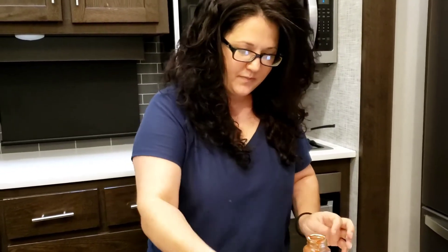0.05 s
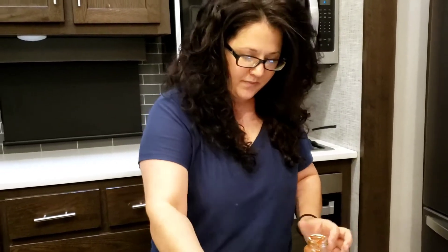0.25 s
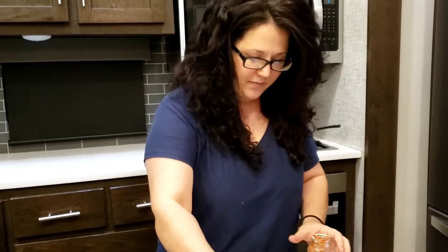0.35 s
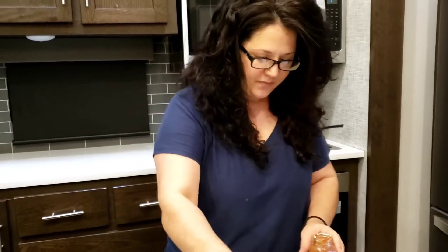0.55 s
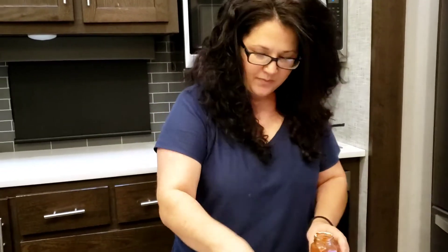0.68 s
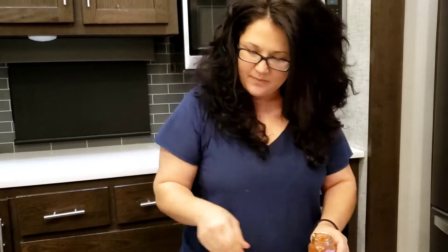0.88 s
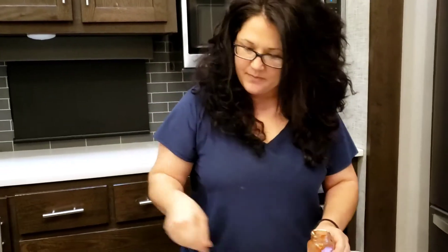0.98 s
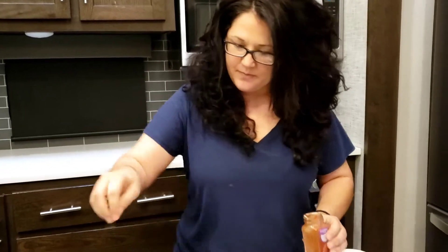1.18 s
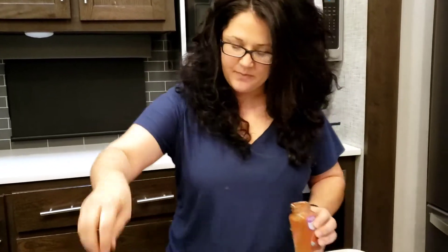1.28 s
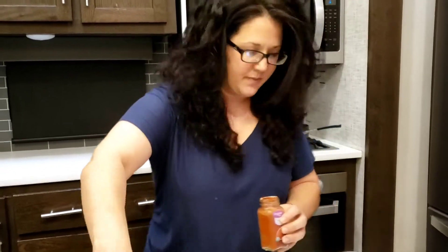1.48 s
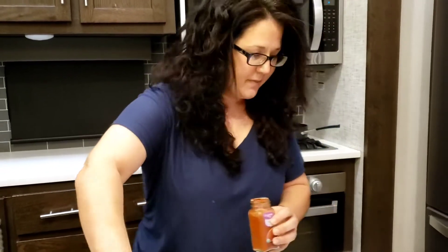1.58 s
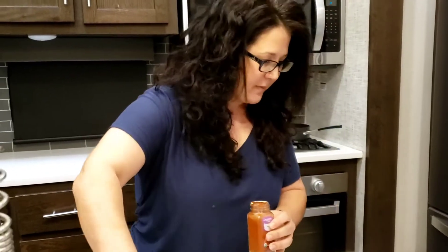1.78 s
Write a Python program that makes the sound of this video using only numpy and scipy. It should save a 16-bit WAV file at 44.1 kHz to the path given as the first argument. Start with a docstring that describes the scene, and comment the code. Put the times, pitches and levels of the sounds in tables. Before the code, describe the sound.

Steel utensils clink and rattle on a kitchen counter, followed by soft handling noises.

```python
"""A low room rumble and a faint rustle, then steel utensils clink close by on a kitchen counter.
Nudged, slid and dropped, they give bright ticks, duller clacks and thin metal rings;
the heavier blows thump the counter. A small live kitchen smears each contact.
Afterwards only soft handling noises remain over the rumble."""
import sys
import numpy as np
from scipy import signal
from scipy.fft import rfft, irfft
from scipy.io import wavfile

SR = 44100
rng = np.random.default_rng(int(sys.argv[2]) if len(sys.argv) > 2 else 0)


def digitize_waveform(pressure):
    """Quantize a signal to 16-bit integers and store it at the path in sys.argv[1].

    Rows of a 2-D input are taken as channels; values are limited to [-1, 1].
    """
    field = np.atleast_2d(pressure).T
    bounded = np.clip(field, -1, 1)
    quanta = np.round(bounded * 32767).astype(np.int16)
    wavfile.write(sys.argv[1], SR, quanta)


N = 81585


def undb(db):
    """Decibels to gain."""
    return 10 ** (np.asarray(db) / 20)


def at(points, hz):
    """Read a table on a log-frequency axis."""
    p = np.array(points, float)
    return np.interp(np.log(hz + 1e-6), np.log(p[:, 0]), p[:, 1])


def sides(db):
    """Left and right gains for a level difference, at constant power."""
    gains = undb(np.array([db, -db]) / 2).reshape(2, -1)
    return gains / np.sqrt(np.mean(gains ** 2, axis=0))


def wander(rate, size=N):
    """Random drift with a spread near 1, turning `rate` times a second."""
    knots = rng.standard_normal(256)
    return np.interp(np.arange(size) / SR * rate, np.arange(len(knots)), knots)


def decay(t, t60):
    """A fade that falls 60 dB in t60 seconds."""
    return np.exp(-np.log(1000) * t / t60)


def add(out, start, sound):
    """Mix a sound in at a time in seconds."""
    i = int(start * SR)
    out[:, i:i + sound.shape[1]] += sound[:, :N - i]


# Stereo lean. Each row: frequency in Hz, left over right in dB.
STEREO_LEAN = [(60, -2.5), (250, -3.5), (700, -6.5), (1300, -9), (2400, -10), (4800, -9), (6800, -2),
               (8500, 4), (11000, 0), (15000, 0.2)]
# Stereo width. Each row: frequency in Hz, likeness of the channels from 0 (wide) to 1 (mono).
STEREO_LIKENESS = [(60, .98), (150, 0.76), (350, .65), (800, 0.3), (2000, 0.068), (15000, 0.027)]
def noise(colour, size=N):
    """Coloured noise at unit level with the room's stereo image: narrow lows, wide highs."""
    hz = np.arange(size // 2 + 1) * SR / size
    common, left, right = rfft(rng.standard_normal((3, size)))
    likeness = at(STEREO_LIKENESS, hz)
    spectrum = np.sqrt(likeness) * common + np.sqrt(1 - likeness) * np.array([left, right])
    wave = irfft(spectrum * undb(at(colour, hz)) * sides(at(STEREO_LEAN, hz)), size)
    return wave / np.sqrt(np.mean(wave ** 2))


def burst(colour, crack_s=0.0004, early_s=0.0077, room_t60_s=0.31):
    """One contact: a crack, close reflections off counter and cupboards, then the room's tail."""
    t = np.arange(SR // 2) / SR
    crack = undb(0.5) * np.exp(-t / crack_s)
    early = np.exp(-t / early_s)
    tail = undb(-3) * decay(t, room_t60_s)
    return noise(colour, len(t)) * np.sqrt(crack ** 2 + early ** 2 + tail ** 2)


def ring(modes, rise_s=0.0005, scatter_db=3, waver=0.41, detune=0.001):
    """Struck modes; each blow weights them anew and reflections make them waver in each ear."""
    t = np.arange(SR // 2) / SR
    out = np.zeros((2, len(t)))
    for hz, db, t60 in modes:
        weight, drift = rng.standard_normal(2)
        envelope = undb(db + scatter_db * weight) * decay(t, t60)
        lean = sides(at(STEREO_LEAN, hz))
        for ear in range(2):
            phase = 2 * np.pi * (hz * (1 + detune * drift) * t + rng.random())
            reflected = waver * wander(70, len(t)) * np.cos(phase)
            out[ear] += lean[ear] * envelope * (np.sin(phase) + reflected)
    nominal_rms = np.sqrt(sum(undb(db) ** 2 for _, db, _ in modes) / 2)
    return out * (1 - np.exp(-t / rise_s)) / nominal_rms


# The rumble's dark colour. Each row: frequency in Hz, relative level in dB.
RUMBLE_COLOUR = [(15, -39.5), (30, -15.5), (60, -9.5), (90, -10), (130, -7), (185, -0.5), (230, -2.5),
                 (300, -7), (380, -13), (560, -23), (1050, -19.5), (1700, -31.5), (2900, -32.5),
                 (4500, -41), (7000, -50.5), (11000, -41.5), (15500, -39.5)]
# Its fader ride. Each row: time in seconds, level in dB.
RUMBLE_RIDE = [(0, -63), (.35, -57), (.75, -63.5), (1.0, -66), (1.2, -68.5), (1.42, -67.5), (1.56, -66.5),
               (1.65, -71), (1.78, -66), (1.85, -66)]
def room_tone(waver_db=1.5, lag_s=0.00049, pan_db=-2):
    """A low, gently wavering rumble with a trace of hiss, reaching the right side first."""
    t = np.arange(N) / SR
    level_db = np.interp(t, *np.array(RUMBLE_RIDE).T) + waver_db * wander(12)
    left, right = noise(RUMBLE_COLOUR) * undb(level_db)
    return np.array([np.roll(left, int(lag_s * SR)), right]) * sides(pan_db)


# A soft rub and a bright tick. Each row: frequency in Hz, relative level in dB.
RUB_COLOUR = [(200, -5.5), (600, -10), (1000, 3), (1500, 0), (2000, -14.5), (3200, -8.5), (5500, -13.5),
              (7500, -27), (15000, -28)]
TICK_COLOUR = [(3000, -42), (7400, -29), (8500, -11.5), (10400, -8), (11500, -2), (12200, -1.5),
               (12550, -5), (12900, 0), (13400, -7.5), (14100, 1), (15300, -8), (16000, -7.5)]
# Hand moves. Each row: centre in seconds, half-width in seconds, rub in dB, crisp rustle in dB.
HAND_MOVES = [(0.015, .03, -80, -83), (1.056, 0.049, -76, -75.5), (1.145, 0.035, -74, -80),
              (1.31, 0.053, -80, -90), (1.432, .04, -92, -104), (1.748, 0.028, -73.5, -85.5)]
# A faint tap among them. Each row: start in seconds, level in dB.
HAND_TAPS = [(1.115, -66.5)]
def handling(flutter_db=2):
    """Hands rub and rustle softly as a jar is picked up."""
    out, t = np.zeros((2, N)), np.arange(N) / SR
    rub, crisp = noise(RUB_COLOUR), noise(TICK_COLOUR)
    for centre, width, rub_db, crisp_db in HAND_MOVES:
        swell = np.exp(-((t - centre) / width) ** 2 / 2)
        out += swell * (undb(rub_db) * rub + undb(crisp_db) * crisp)
    out *= undb(flutter_db * wander(90))
    for start, db in HAND_TAPS:
        add(out, start, undb(db) * (burst(TICK_COLOUR) + undb(-1) * burst(RUB_COLOUR)))
    return out


# The ping's main note and side modes. Each row: pitch in Hz, relative level in dB, T60 in seconds.
PING_NOTE = [(4813, 0, .31)]
PING_SIDE_MODES = [(3114, -2, .22), (3203, -2, .22), (3714, -4, .2), (4699, 1, .28), (4765, 0, .28),
                   (7811, 0, .14)]
# A light clink. Each row: frequency in Hz, relative level in dB.
CLINK_COLOUR = [(1500, -34.5), (2400, -19), (2900, 0), (3200, -3.5), (4200, 2), (4800, 4.5), (5300, -16.5),
                (6800, -28), (7800, 4), (8400, -24.5), (15000, -36.5)]
# Ping cues. Each row: start in seconds, then main note, side modes and clink in dB before the mix.
PING_HITS = [(.0935, -49, -49, -48.5), (.698, -42, -66, -58), (.724, -43, -68, -62)]
def pinging_utensil():
    """One knocked utensil clinks and sings a clear note; a hard contact wakes its other modes."""
    out = np.zeros((2, N))
    for start, note_db, side_db, clink_db in PING_HITS:
        rings = undb(note_db) * ring(PING_NOTE) + undb(side_db) * ring(PING_SIDE_MODES)
        add(out, start, rings + undb(clink_db) * burst(CLINK_COLOUR))
    return out


# Two utensils' modes. Each row: pitch in Hz, relative level in dB, T60 in seconds.
FIRST_STEEL = [(2856, -15, .27), (3250, -19, .24), (4010, -22, .2), (5510, -16, .18), (6800, -19, .2),
               (7800, -21, .25), (8455, -14, .15), (10630, -10, .2), (11050, -10, .24), (11460, 1, .19),
               (11910, -2, .21), (12110, -1, .24), (12915, -2, .22), (13860, -2, .21), (14085, -1, .21),
               (14340, 0, .22), (14635, -5, .2)]
SECOND_STEEL = [(1960, -19, .25), (2410, -11, .15), (3264, -9, .3), (3360, -8, .19), (4435, -13, .16),
                (5180, -7, .19), (5590, -13, .2), (7808, -19, .22), (8712, -4, .24), (8932, -1, .22),
                (9690, -7, .2), (10437, -5, .2), (11840, -1, .2), (12000, 0, .18), (12240, 0, .2),
                (13004, -2, .2), (14282, 0, .2)]
# The duller clack. Each row: frequency in Hz, relative level in dB.
CLACK_COLOUR = [(300, -33), (520, -25.5), (700, -10.5), (950, -9.5), (1500, -9.5), (2000, -6.5),
                (3300, -1.5), (4300, -2), (5500, 1), (6300, -8), (6900, -2), (7400, -18.5), (9000, -21),
                (14000, -38.5)]
# Rattle cues. Each row: start in seconds, then tick, clack, first ring and second ring in dB
# before the mix, then leftward pan of tick and rings in dB.
RATTLE_HITS = [(0.0951, -38.5, -52, -46, -75, 2), (0.1947, -31, -36.5, -66, -74, 0.5),
               (0.2118, -22.5, -33.5, -43, -68, -1.5), (.232, -31.5, -33, -50.5, -65, -2),
               (0.2587, -22, -32.5, -49, -64, 2), (0.3454, -26.5, -34.5, -23.5, -47, -3.5),
               (.355, -25, -36.5, -21.5, -51, 3.5), (0.3942, -23, -44.5, -24.5, -47.5, 1),
               (0.434, -25.5, -47, -29.5, -52, -2.5), (0.4569, -21.5, -41.5, -21, -44.5, 5.5),
               (.468, -25.5, -45.5, -30.5, -50.5, -1), (0.526, -25.5, -39.5, -23, -28, 5.5),
               (.545, -26.5, -47.5, -28.5, -36, 0.5), (.584, -30.5, -51, -36, -32.5, 4.5),
               (0.603, -27.5, -42, -29.5, -41, 1.5), (0.6184, -22, -29, -31, -34.5, -1.5),
               (.627, -21.5, -41, -19.5, -30, 5.5), (.638, -28, -40.5, -28, -25.5, -1.5),
               (.650, -28.5, -43.5, -31, -30.5, 2), (0.66, -27.5, -37.5, -26.5, -26.5, 2),
               (.673, -38.5, -46, -35, -39.5, 2), (.701, -35, -55.5, -37, -63, 2),
               (0.736, -35.5, -44.5, -58, -68, 11), (0.755, -47, -54.5, -41, -47, -1),
               (0.8021, -43, -52.5, -46, -72, 2.5)]
def rattling_utensils():
    """Every contact ticks, clacks and sets the steel of two utensils ringing."""
    out = np.zeros((2, N))
    for start, tick_db, clack_db, first_db, second_db, pan_db in RATTLE_HITS:
        tick = undb(tick_db) * burst(TICK_COLOUR)
        rings = undb(first_db) * ring(FIRST_STEEL) + undb(second_db) * ring(SECOND_STEEL)
        clack = undb(clack_db) * burst(CLACK_COLOUR)
        add(out, start, sides(pan_db) * (tick + rings) + clack)
    return out


# The slide swells with pressure. Each row: time in seconds, level in dB.
SLIDE_RIDE = [(.12, -84.5), (.19, -53), (.22, -36.5), (.25, -44), (.275, -39), (.30, -59.5), (.34, -59),
              (.36, -29.5), (.40, -33), (.475, -33), (.495, -58), (.525, -52), (.55, -33.5), (.61, -35),
              (.67, -32), (.70, -51.5), (.80, -72), (.86, -89.5)]
def sliding(grains_per_s=270, scatter_db=5.5):
    """Steel chatters over steel in a stream of tiny uneven contacts that keep it ringing."""
    t = np.arange(N) / SR
    grains = (rng.random(N) < grains_per_s / SR) * undb(scatter_db * rng.standard_normal(N))
    grains *= undb(np.interp(t, *np.array(SLIDE_RIDE).T)) / np.sqrt(np.mean(grains ** 2))
    contact = burst(TICK_COLOUR) + undb(-10) * burst(CLACK_COLOUR) + undb(-6.5) * ring(FIRST_STEEL)
    contact /= np.sqrt(np.sum(contact ** 2) / 2)
    return signal.fftconvolve(grains[None], contact, axes=1)[:, :N]


# The counter's low thump and hollow knock. Each row: frequency in Hz, relative level in dB.
THUMP_COLOUR = [(15, -45), (30, -25), (55, -12.5), (75, -14), (98, -3.5), (125, -9), (160, -2.5),
                (220, -17.5), (310, -13), (420, -20), (800, -44.5), (4000, -79)]
KNOCK_COLOUR = [(200, -14), (330, -13), (510, -23.5), (610, -6), (710, 2), (850, -0.5), (1200, -24.5),
                (1900, -15.5), (2400, -0.5), (3000, -16), (8000, -51.5)]
# The knock's ring. Each row: pitch in Hz, relative level in dB, T60 in seconds.
COUNTER_MODES = [(600, -7, .16), (695, 0, .1), (790, -6, .11), (1250, -13, .12), (1960, -5, .12),
                 (2365, 5, .11), (2480, 0, .1)]
# Blows that reach the counter. Each row: start in seconds, thump in dB, knock in dB.
COUNTER_HITS = [(0.196, -60, -52), (0.213, -57, -56), (.234, -49, -56), (0.26, -55, -58),
                (.346, -64, -58.5), (0.402, -69, -75), (0.529, -66.5, -67.5), (.617, -47, -37),
                (.637, -45.5, -55), (0.658, -52, -58)]
def counter(boom_hz=99, thump_rise_s=0.003, knock_rise_s=0.002, knock_decay_s=0.037):
    """The worktop answers heavier blows with a low thump, its own boom and a hollow knock."""
    out, t = np.zeros((2, N)), np.arange(SR // 2) / SR
    boom = sides(at(STEREO_LEAN, boom_hz)) * np.sin(2 * np.pi * boom_hz * t) * decay(t, t60=0.23)
    for start, thump_db, knock_db in COUNTER_HITS:
        thump = noise(THUMP_COLOUR, len(t)) * decay(t, t60=0.36) + boom
        thump *= 1 - np.exp(-t / thump_rise_s)
        knock = burst(KNOCK_COLOUR) * np.exp(-t / knock_decay_s) + undb(3.5) * ring(COUNTER_MODES)
        knock *= 1 - np.exp(-t / knock_rise_s)
        add(out, start, undb(thump_db) * thump + undb(knock_db) * knock)
    return out


def scene():
    """Utensils, counter and hands over the room tone."""
    utensils = undb(-2) * (rattling_utensils() + pinging_utensil())
    return utensils + sliding() + counter() + handling() + room_tone()


def record(dry):
    """The recorder cuts the top steeply."""
    top_hz = 15550
    return signal.sosfilt(signal.ellip(10, .2, 75, top_hz, fs=SR, output="sos"), dry)


dry = scene()
out = record(dry)
digitize_waveform(out)
```